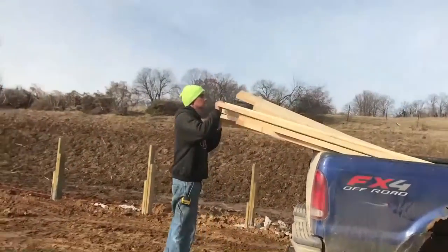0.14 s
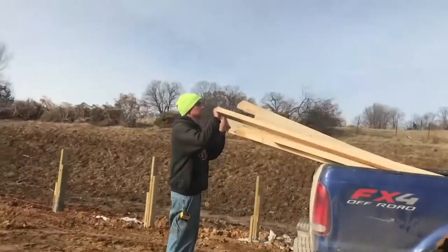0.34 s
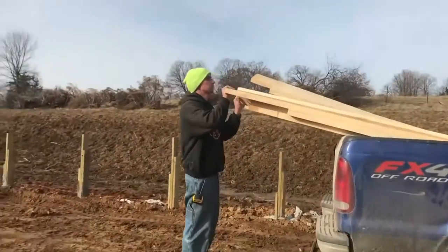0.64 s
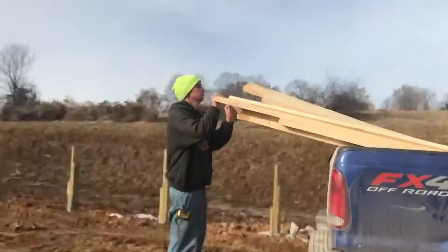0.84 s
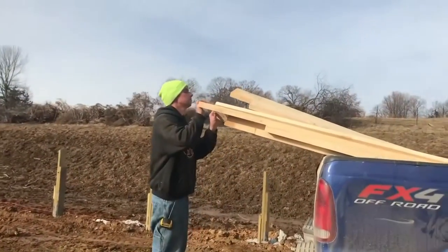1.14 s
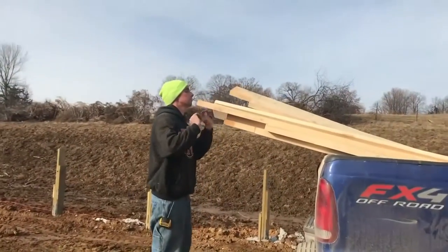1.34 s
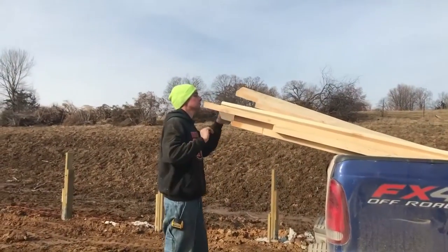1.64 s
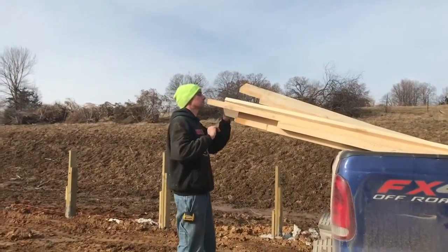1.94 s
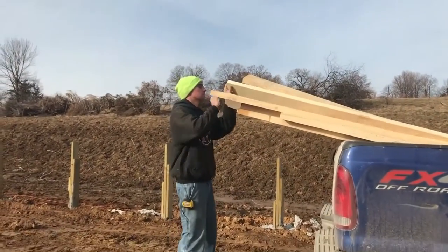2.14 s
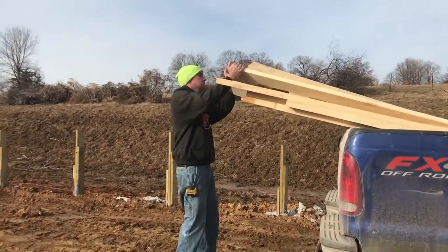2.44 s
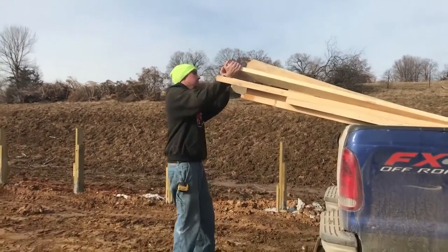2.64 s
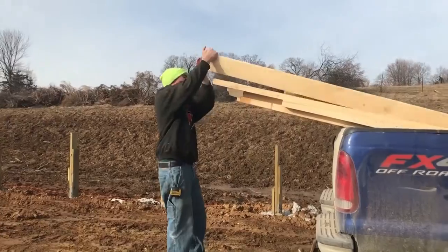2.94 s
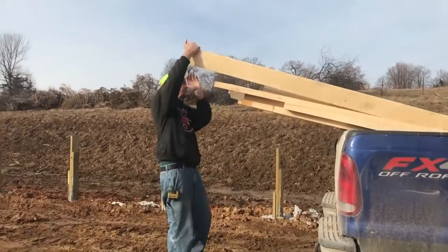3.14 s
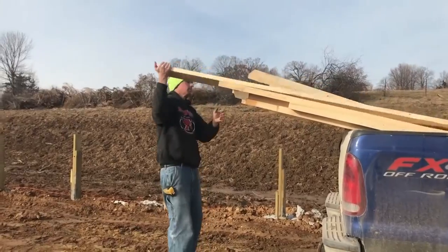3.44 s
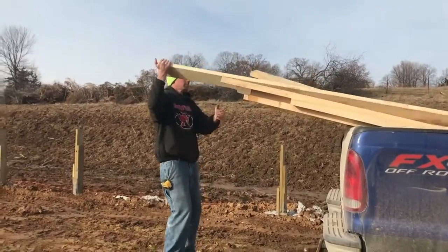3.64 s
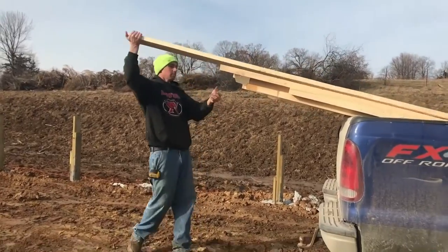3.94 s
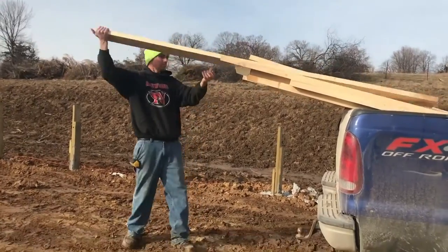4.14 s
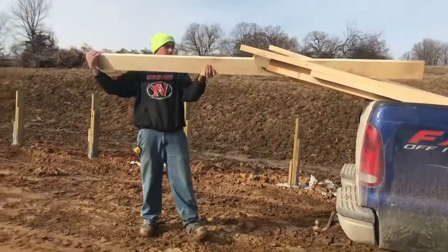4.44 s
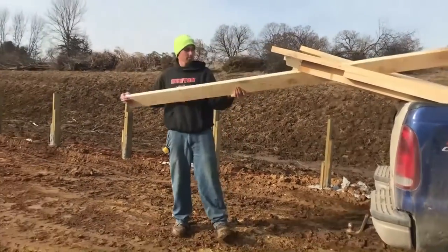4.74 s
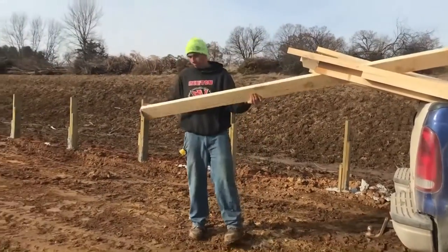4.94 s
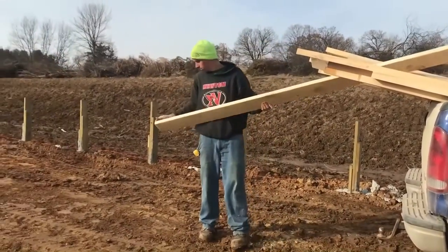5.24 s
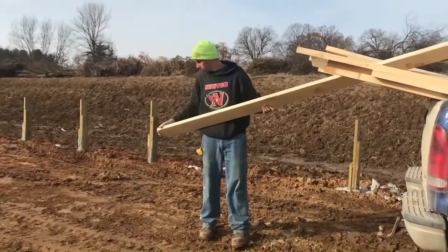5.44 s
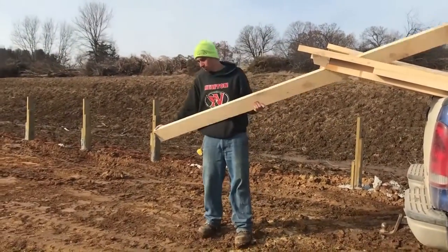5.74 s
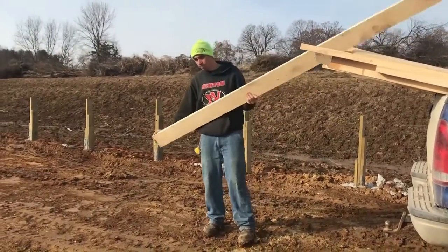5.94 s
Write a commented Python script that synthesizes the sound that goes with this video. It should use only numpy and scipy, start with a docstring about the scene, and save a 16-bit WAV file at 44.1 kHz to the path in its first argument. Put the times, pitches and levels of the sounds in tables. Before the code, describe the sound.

Outdoors in a quiet open field, lumber on a truck bed gives a fast burst of hard woody knocks in the first second. Near silence follows, with faint ticks, light rubbing and a low distant engine hum. Then the boards clatter again, with squeaky creaks and a dense run of knocks, and a rough scrape as one is drawn off. It ends in soft scuffs and ticks. Single microphone a few metres away, dry, no echo.

```python
"""Rough boards knock together as they are shaken loose and drawn off a stack on a truck bed in an open field.
Each blow rings decaying wood modes over a dense noise body. Rubbed faces turn clicks and hiss into wood
tone, rasp, fizz and a low rumble, with short scuffs and ringing ticks. Gliding tones and narrow hiss make
faint chirps and squeaks; narrow low noise makes an engine far off, and weak filtered noise the quiet air."""
import sys
import numpy as np
from scipy import signal
from scipy.fft import rfft, irfft, next_fast_len
from scipy.io import wavfile
from scipy.ndimage import uniform_filter1d

SR = 44100
rng = np.random.default_rng(int(sys.argv[2]) if len(sys.argv) > 2 else 0)


def materialize(psi):
    """Save the field psi as 16-bit PCM at rate SR to the path in sys.argv[1].

    A 1-D psi becomes a single channel; in a 2-D psi each row is a channel.
    """
    bounded = np.clip(np.atleast_2d(psi).T, -1, 1)
    quanta = np.round(bounded * 32767).astype(np.int16)
    wavfile.write(sys.argv[1], SR, quanta)


N = 268348
TIME = np.arange(N) / SR

# Boards struck together. Each row: start in seconds, blow level in dB, then thump, knock and clack
# in dB relative to the blow.
BLOWS = [(0.256, -29.5, -8, -17, -22), (0.343, -13, -22, -6, 3), (0.355, -14.5, -13.5, -15, -15),
         (0.471, -22, -11, -19, -19), (0.56, -4.5, -14, -9, -11), (0.599, -12.5, -26, -13.5, -15.5),
         (0.766, -8, -12.5, -5, -8.5), (0.956, -40, 6, -13, -17), (2.118, -38, -17, -10, -18),
         (2.696, -46, 6.5, -15, -9), (2.869, -29.5, -3, -11, -31), (2.885, -29.5, -21, -10, -15),
         (3.12, -18, -2, -7, -11), (3.154, -8.5, -44, -9.5, -24), (3.212, -23.5, -18, -14, -46),
         (3.299, -29.5, -12, -12, -18), (3.375, -32.5, 3.5, -13, -21), (3.596, -24.5, -7, -4, -12.5),
         (3.704, -27.5, -1.5, -13, -37), (3.739, -24.5, -11, -22, -30), (3.861, -23.5, -2, -2.5, -11.5),
         (3.911, -7, -17, -1.5, -17), (3.945, -17.5, -2, -7, -19), (4.004, -14.5, -5, -17, -14),
         (4.03, -10.5, -9, -6, -10.5), (4.069, -12, -15, -13, -29), (4.149, -20.5, -11, -26, -35),
         (4.229, -27.5, -29, -12, -8), (4.498, -38, 3, -15, -37), (4.887, -33, 2, -6, -12),
         (4.922, -36.5, 0, -28, -19), (5.922, -38, -5.5, -9, -8)]
# Modes of the boards and the bed. Each row: nominal frequency in Hz, level in dB, and decay time to
# -60 dB in seconds before the scaling by weight of blow.
WOOD_MODES = [(50, -4, 0.43), (82.7, 0.5, 0.41), (105.2, -7, 0.32), (135.2, -1, 0.59), (189, -4.5, 0.5),
              (223.2, -3.5, 0.3), (260.3, -4.5, 0.37), (301.6, 1.5, 0.24), (338, -3.5, 0.24),
              (396, -0.5, 0.16), (451, -6.5, 0.18), (577.3, -1.5, 0.26), (645.2, -5, 0.23),
              (741.6, -3, 0.15), (855, 0, 0.17), (919, -1, 0.073), (1011, -3, 0.12), (1083, -9.5, 0.028),
              (1259, -9.5, 0.1), (1380, -25, 0.24), (1584, 2.5, 0.053), (1814, -4.5, 0.062),
              (2023, -8.5, 0.037), (2300, -14, 0.082), (2500, -15, 0.075), (2760, -51, 0.033)]
# Centres, in Hz, of the thump, blow, knock, clack, rap and crack bands.
BLOW_BANDS_HZ = (90, 280, 590, 980, 1650, 3500)
# Dense body of a blow, its modes too many to tell apart. Each row: frequency in Hz, level in dB, and
# decay time to -60 dB in seconds before the same scaling.
BLOW_BODY = [(40, -7, 0.28), (101, 4.5, 0.87), (306, -6, 0.51), (736, 2, 0.16), (1460, -1, .12),
             (3050, -7.5, 0.19), (5060, -11, 0.044), (8900, -19, 0.045), (16000, -24, .06)]
# Steady sliding. Each row: time in seconds, then levels of rasp, rumble and fizz in dB.
SLIDING_LEVELS = [(0.0, -67, -56, -78), (0.13, -68.5, -62, -60.5), (0.28, -55.5, -45, -66),
                  (0.42, -63.5, -48, -72), (1.05, -75, -56.5, -68.5), (1.59, -72.5, -62, -70.5),
                  (2.1, -68.5, -56, -66), (2.47, -65.5, -53.5, -63.5), (2.75, -66.5, -59, -65.5),
                  (3.08, -49, -40.5, -58), (3.27, -62.5, -56, -67), (3.58, -61, -49.5, -61.5),
                  (3.75, -62, -35.5, -72), (3.9, -57.5, -45, -58.5), (4.2, -51.5, -40.5, -70),
                  (4.42, -50.5, -39, -53), (4.58, -62.5, -58.5, -56.5), (4.71, -52.5, -48, -58.5),
                  (4.86, -69.5, -52.5, -59.5), (5.05, -62.5, -64.5, -65), (5.56, -63.5, -61.5, -64.5),
                  (5.73, -67, -66, -64.5), (6.08, -68, -57, -64)]
# Resonances of scraped wood. Each row: frequency in Hz, width in Hz, level in dB.
WOOD_TONE = [(567, 34, -3.5), (825, 64, -24), (944, 94, 0.5), (1115, 93, -5), (1364, 110, -5),
             (1537, 49, -8.5), (1723, 17, -9), (1930, 53, -21.5)]
# Higher resonances in the rasp. Each row: frequency in Hz, width in Hz, level in dB.
RASP_RINGS = [(2236, 58, 10), (2500, 150, 4.5), (2900, 63, -11), (3240, 260, 1.5), (3970, 37, -12),
              (4070, 38, -9)]
# Spectrum of the rasp. Each row: frequency in Hz, relative density in dB per Hz.
RASP_SPECTRUM = [(880, -23), (1500, -4), (1710, -9.5), (2030, 0.5), (2190, -1), (3000, -1), (4390, -2),
                 (4930, -8.5), (6500, -11), (8450, -28), (14300, -120)]
# Spectrum of the fizz. Each row: frequency in Hz, relative density in dB per Hz.
FIZZ_SPECTRUM = [(4800, -11), (5800, -10), (6600, -12.5), (8600, -4), (9400, -4.5), (10500, -12),
                 (11700, -6.5), (14000, -11.5), (15500, -13), (16500, -2)]
# Short hard scuffs. Each row: start in seconds, length in seconds, rasp level in dB, brightness in dB.
SCUFF_EVENTS = [(0.058, 0.039, -62.5, -4), (.245, 0.082, -64.5, -17), (0.357, 0.039, -50.5, 5.5),
                (0.471, 0.061, -55, -10), (0.552, 0.044, -50, -3), (0.741, 0.011, -57, -7),
                (0.759, 0.056, -51, 5.5), (1.246, 0.15, -67.5, 1), (2.313, 0.084, -62, -8),
                (2.415, 0.04, -62, 7), (2.443, 0.098, -63.5, 13), (2.833, 0.11, -66, -7),
                (2.977, 0.016, -68, 23), (3.126, 0.05, -53, -20.5), (3.187, 0.013, -59, 14),
                (3.272, 0.084, -53, 1.5), (3.383, 0.03, -57, 0), (3.467, 0.055, -58, 2),
                (3.507, 0.056, -75, 10), (3.592, 0.036, -49, -3), (3.64, 0.025, -55.5, 6),
                (3.72, 0.073, -56.5, 11), (3.77, 0.025, -56, 5), (3.799, 0.057, -58, 17),
                (3.975, 0.012, -62, 8), (4.14, 0.029, -57, -1), (4.202, 0.02, -46, -5),
                (4.237, 0.029, -55, -6), (4.312, 0.14, -49, -7.5), (4.528, 0.11, -69, 20),
                (4.661, 0.073, -51.5, 1), (4.854, 0.013, -58, 5), (5.139, 0.072, -62.5, -1),
                (5.361, 0.065, -57, 2), (5.458, 0.029, -61.5, 0), (5.679, 0.1, -64, -3),
                (5.92, 0.096, -52, -9.5), (6.054, 0.035, -67.5, 20.5)]
# Ticks of splinters and grit. Each row: start in seconds, level in dB, frequency in Hz.
TICK_EVENTS = [(0.0618, -40, 2060), (0.3038, -30.5, 2100), (1.018, -35.5, 3280), (1.786, -42, 2060),
               (2.156, -38, 2440), (2.25, -59, 3040), (2.9944, -36, 3560), (3.1894, -43, 3140),
               (3.234, -38, 3250), (3.3685, -35, 3520), (3.479, -27, 2700), (3.49, -25.5, 3280),
               (3.584, -41, 4100), (3.5957, -31, 2290), (4.234, -32, 2220), (4.864, -43, 2660),
               (5.389, -30, 2270), (5.457, -49, 2400), (5.686, -38.5, 3280), (5.7132, -38, 4080),
               (5.7228, -25.5, 5780), (5.7278, -34.5, 2290), (5.7536, -39, 2020), (5.8378, -45, 2220)]
# Faint chirps and squeaks. Each row: start in seconds, length in seconds, start pitch in Hz,
# end pitch in Hz, level in dB.
CHIRP_EVENTS = [(.47, 0.061, 880, 850, -45), (1.036, 0.019, 720, 750, -48.5),
                (1.657, 0.039, 4250, 4370, -67), (2.512, 0.035, 5400, 5140, -60),
                (2.533, 0.041, 4800, 4300, -57.5), (2.564, 0.051, 3700, 3500, -57),
                (2.68, 0.052, 7200, 7050, -64), (3.228, 0.018, 3330, 3200, -49),
                (3.672, 0.038, 4070, 4150, -56), (3.719, 0.008, 4200, 4030, -45),
                (3.74, 0.013, 4200, 3870, -42), (3.775, 0.018, 5500, 5100, -49.5),
                (3.79, 0.017, 3040, 3060, -46), (3.799, 0.025, 4250, 4150, -46),
                (3.81, 0.033, 3500, 3440, -45), (3.814, 0.036, 1950, 1780, -49),
                (3.817, 0.032, 6650, 6700, -50), (4.234, 0.042, 932, 940, -36),
                (4.331, 0.05, 2250, 2190, -46), (4.382, 0.035, 4470, 4240, -47),
                (4.685, 0.052, 780, 824, -42.5), (4.77, 0.089, 4100, 4000, -56),
                (4.82, 0.044, 3900, 3600, -54), (5.305, 0.17, 1036, 993, -59),
                (5.578, 0.24, 974, 920, -61.5), (5.928, 0.093, 1100, 1088, -44),
                (5.918, 0.084, 1680, 1610, -44), (5.963, 0.036, 2020, 2050, -45),
                (6.045, 0.012, 5600, 5600, -55)]
# Overtones of a squeak. Each row: multiple of its pitch, relative level in dB.
SQUEAK_OVERTONES = [(2.051, 2), (3.3, -9)]
# Far engine note. Each row: time in seconds, pitch in Hz, level in dB.
ENGINE_NOTE = [(0, 65, -72), (1.4, 67, -66), (1.65, 68.6, -56), (2.0, 68.7, -51), (2.35, 68.3, -44.5),
               (2.75, 67.5, -51), (3.0, 67, -66), (5.0, 65.9, -59), (5.9, 64.8, -65), (6.085, 65, -40.5)]
# Low rumble between blows. Each row: time in seconds, level in dB.
RUMBLE_LEVEL = [(0.0, -52), (1.54, -59), (1.69, -52.5), (2.2, -53.5), (2.9, -57.5), (3.8, -45),
                (4.6, -53.5), (4.95, -54), (5.3, -61), (5.65, -54.5), (6.08, -51.5)]
# Spectrum of the air. Each row: frequency in Hz, relative density in dB per Hz.
AIR_SPECTRUM = [(15, -43), (25, -32), (65, -8), (92, -9), (162, -6.5), (225, -51), (357, -12), (443, -37),
                (494, -47), (2960, -72), (4330, -43), (4950, -50), (14700, -34), (16300, -61)]

RAP_DB, RAP_PER_CLACK = -12, 0.63  # the rap follows the clack
CRACK_DB, CRACK_PER_BLOW = -32, -0.3  # the crack grows less than the blow
RING_LIGHT, RING_PER_DB, HEAVY_DB = 0.94, -0.013, -15  # blows above HEAVY_DB clamp the boards: shorter ring
SNAP, SNAP_S = 0.98, 0.003  # extra gain of the body at first contact, and its decay constant
CHATTER_S = 0.012  # decay constant of the rebounds
TONE_DB, TONE_FROM_RASP = 1, 0.69  # the wood tone's level lies between rasp and rumble, raised by TONE_DB
SCUFF_TONE_DB, SCUFF_FIZZ_DB = -4.5, -7  # relative to the scuff's rasp
TICK_EDGE_T60_S, TICK_HZ = 0.015, 2500  # decay of the gritty edge at this pitch; higher ticks die sooner
FUZZ, FUZZ_PER_DB, FUZZ_FROM_DB = 0.71, 0.04, -46  # share of hiss in a whistle, rising above FUZZ_FROM_DB
OVERTONE_DB, OVERTONE_PER_DB = 35.5, 2.3  # louder squeaks carry relatively stronger overtones
CREAK_FROM_S, CREAK_TO_S = 3.67, 3.85  # a flurry of small squeaks
CREAK_LOW_HZ, CREAK_HIGH_HZ, CREAK_MAX_DB = 3000, 4320, -55  # range of starting pitch, loudest level
AIR_DB = -62
BAND_EDGE_HZ = 15750


def knock(blow_db, thump_db, knock_db, clack_db):
    """Modal impact: a blow and its rebounds excite decaying modes over a dense body of noise."""
    t = np.arange(round(0.4 * SR)) / SR
    rap_db = RAP_DB + RAP_PER_CLACK * clack_db
    crack_db = CRACK_DB + CRACK_PER_BLOW * blow_db
    bands_db = [thump_db, 0, knock_db, clack_db, rap_db, crack_db]
    ring = max(RING_LIGHT + RING_PER_DB * max(blow_db - HEAVY_DB, 0), 0.2)
    ringing = wood_ringing(t, bands_db, ring)
    body = blow_body(t, bands_db, ring)
    snap = 1 + SNAP * np.exp(-t / SNAP_S)
    onset = 1 - np.exp(-t / 0.0012)
    return amp(blow_db) * (ringing + amp(10.0) * body * snap) * onset


def wood_ringing(t, bands_db, ring):
    """Superposition of damped sine modes, repeated by random rebounds that share one blow's energy."""
    hz, db, t60 = np.array(WOOD_MODES).T[:, :, None]
    scatter_db, detune = rng.standard_normal((2, len(WOOD_MODES), 1))
    # every blow weighs and tunes the modes a little differently
    weight = amp(db + read(hz, BLOW_BANDS_HZ, bands_db) + 3.15 * scatter_db) * np.sign(detune)
    decay = amp(-60 * t / (t60 * ring))
    modes = (weight * decay * np.sin(2 * np.pi * hz * (1 + 0.016 * detune) * t)).sum(0)
    rebounds = rng.standard_normal(4000) * (rng.random(4000) < 0.006) * np.exp(-t[:4000] / CHATTER_S)
    rebounds[0] = 3  # the blow itself
    ringing = signal.fftconvolve(modes, rebounds)[:len(t)]
    return ringing * 0.38 * np.linalg.norm(modes) / np.linalg.norm(ringing)


def blow_body(t, bands_db, ring):
    """Statistical modal density: noise stands for crowded modes, each frequency with its own decay."""
    hz, when, z = signal.stft(rng.standard_normal(len(t)), SR, nperseg=512, noverlap=384)
    body_hz, body_db, body_t60 = np.transpose(BLOW_BODY)
    colour_db = read(hz, body_hz, body_db) + read(hz, BLOW_BANDS_HZ, bands_db)
    t60 = ring * read(hz, body_hz, body_t60)
    z *= amp(colour_db[:, None] - 60 * when / t60[:, None])
    return signal.istft(z, SR, nperseg=512, noverlap=384)[1][:len(t)]


def sliding():
    """Friction excitation: one rubbing drives tone, rasp and fizz; slower catches rumble the stack."""
    rub = grit(4000, spread_db=3.0, hiss=1.8, flicker_db=1.2, flicker_s=0.004)
    rub = patchy(rub, patchy_db=1.4)
    broad_tone = coloured(rub, [(450, -2), (650, 14.5), (2000, 1), (2400, -52)])
    tone = evened(rung(rub, WOOD_TONE) + 1.43 * broad_tone)
    rasp = evened(0.32 * rung(rub, RASP_RINGS) + coloured(rub, RASP_SPECTRUM))
    fizz = coloured(rub, FIZZ_SPECTRUM)
    s, *curves = np.transpose(SLIDING_LEVELS)
    rasp_db, rumble_db, fizz_db = (np.interp(TIME, s, curve) for curve in curves)
    tone_db = TONE_DB + TONE_FROM_RASP * rasp_db + (1 - TONE_FROM_RASP) * rumble_db
    rattle = stirred(db=-49, share=0.92, fall_db_per_s=42, rise_s=0.021)
    faces = (amp(rasp_db) + scuffs(0, lean=0)) * rasp
    faces += (amp(tone_db) + scuffs(SCUFF_TONE_DB, lean=-1.02) + amp(-4.5) * rattle) * tone
    faces += (amp(fizz_db) + scuffs(SCUFF_FIZZ_DB, lean=1)) * fizz
    catches = grit(300, spread_db=2.0, hiss=1.0, flicker_db=1.5, flicker_s=0.016)
    stack = coloured(catches, [(70, -20), (110, 5.5), (200, 3.5), (330, 3.0), (500, -4.5), (750, -36.5)])
    return faces + (amp(rumble_db) + rattle) * stack


def grit(per_s, spread_db, hiss, flicker_db, flicker_s):
    """Random impulse process: clicks of uneven size over hiss, with a flickering level."""
    size_db = spread_db * np.minimum(rng.exponential(1, N), 3.2)
    clicks = (rng.random(N) < per_s / SR) * rng.choice([-1, 1], N) * amp(size_db)
    width = max(round(flicker_s * SR), 1)
    flicker = evened(uniform_filter1d(uniform_filter1d(rng.standard_normal(N), width), width))
    return evened((evened(clicks) + hiss * rng.standard_normal(N)) * amp(flicker_db * flicker))


def patchy(x, patchy_db):
    """Surface heterogeneity: rough timber shifts the colour of the rubbing from patch to patch."""
    z = signal.stft(x, nperseg=256)[2]
    patches = uniform_filter1d(uniform_filter1d(rng.standard_normal(z.shape), 4, axis=0), 7, axis=1)
    return evened(signal.istft(z * amp(patchy_db * evened(patches)), nperseg=256)[1][:N])


def scuffs(offset_db, lean):
    """Transient friction: quick bite, slower release; brightness leans levels from tone to fizz."""
    level = np.zeros(N)
    for s, length_s, db, bright_db in SCUFF_EVENTS:
        u = np.linspace(0, 1, round(length_s * SR))
        shape = np.minimum(u / 0.14, 1) * np.minimum((1 - u) / 0.51, 1) ** 0.8
        add(level, s, amp(db + offset_db + lean * bright_db) * shape)
    return level


def stirred(db, share, fall_db_per_s, rise_s):
    """Damped energy storage: each blow adds a jolt to the shaking load, which dies away."""
    jolts = np.zeros(N)
    for s, blow_db, *_ in BLOWS:
        jolts[round(s * SR)] += amp(share * blow_db)
    shaking = signal.lfilter([1], [1, -amp(-fall_db_per_s / SR)], jolts)
    return amp(db) * uniform_filter1d(shaking, round(rise_s * SR))


def ticks():
    """Impulse response of small splinters and grit: two brief damped partials and a bright noise edge."""
    out, t = np.zeros(N), np.arange(1500) / SR
    for s, db, hz in TICK_EVENTS:
        fade = amp(-60 * t / max(TICK_EDGE_T60_S * (TICK_HZ / hz) ** 0.69, 0.003))
        edge = signal.lfilter([1, -1], [1, -1.45, 0.62], rng.standard_normal(len(t))) * fade
        # powers of the fade make the partials die faster than the edge
        low = np.sin(2 * np.pi * hz * t) * fade ** 3.1
        high = np.sin(2 * np.pi * 1.534 * hz * t) * fade ** 1.64
        add(out, s, amp(db) * (low + 0.42 * high + 0.21 * edge))
    return out


def chirps():
    """Frequency modulation: short gliding whistles with rough overtones and a fluttering level."""
    out = np.zeros(N)
    for s, length_s, start_hz, end_hz, db in list(CHIRP_EVENTS) + creak():
        hz = np.linspace(start_hz, end_hz, round(length_s * SR))
        overtones = sum(amp(top_db) * narrow(np.minimum(multiple * hz, SR / 2.2), 0.71)
                        for multiple, top_db in SQUEAK_OVERTONES)
        fuzz = np.clip(FUZZ + FUZZ_PER_DB * max(db - FUZZ_FROM_DB, 0), 0, 1)
        whistle = narrow(hz, fuzz) + amp(OVERTONE_DB + OVERTONE_PER_DB * db) * overtones
        # the contact sticks and slips
        stutter = evened(amp(1.1 * evened(uniform_filter1d(rng.standard_normal(len(hz)), 130))))
        add(out, s, amp(db) * whistle * stutter * signal.windows.tukey(len(hz), 0.4))
    return out


def creak(count=20):
    """Random point process: brief falling squeaks, as rows like the chirps; longer ones are fainter."""
    when, pitch, size = rng.random((count, 3)).T
    hz = CREAK_LOW_HZ + pitch * (CREAK_HIGH_HZ - CREAK_LOW_HZ)
    s = CREAK_FROM_S + when * (CREAK_TO_S - CREAK_FROM_S)
    return list(zip(s, 0.019 * (0.6 + size), hz, 0.96 * hz, CREAK_MAX_DB - 6 * size))


def engine():
    """Narrow-band noise: a wavering far note, and a low rumble that swells as blows shake the truck bed."""
    s, hz, db = np.transpose(ENGINE_NOTE)
    note = amp(np.interp(TIME, s, db)) * evened(narrow(np.interp(TIME, s, hz), 0.25))
    rumble = coloured(rng.standard_normal(N), [(25, -8), (45, 41), (80, 39), (130, 26.0), (200, -46)])
    shaken = stirred(db=-38.5, share=0.71, fall_db_per_s=42, rise_s=0.069)
    return note + (amp(np.interp(TIME, *np.transpose(RUMBLE_LEVEL))) + shaken) * rumble


def quiet_air():
    """Broadband background: uneven, flickering noise shaped by a mostly low spectrum."""
    noise = grit(2000, spread_db=15.0, hiss=11.0, flicker_db=3.2, flicker_s=0.017)
    return amp(AIR_DB) * coloured(noise, AIR_SPECTRUM)


def narrow(hz, fuzz):
    """Tone and narrow-band noise along one pitch curve: fuzz 0 is a clear sine, 1 a narrow hiss."""
    hiss = resonate(rng.standard_normal(len(hz)), hz, 0.063 * hz[0])
    hiss = evened(resonate(hiss, hz, 0.068 * hz[0]))
    return (1 - fuzz) * np.sin(2 * np.pi * np.cumsum(hz) / SR) + fuzz * hiss


def rung(x, rings):
    """Parallel resonance: x heard through a set of rings (Hz, width Hz, dB), rms 1."""
    return evened(sum(amp(db) * evened(resonate(x, hz, width_hz)) for hz, width_hz, db in rings))


def resonate(x, hz, width_hz):
    """Heterodyne resonance of gain 1: shift the pitch curve hz to zero, smooth, and shift back."""
    turn = np.exp(2j * np.pi * np.cumsum(hz * np.ones(len(x))) / SR)
    r = np.exp(-np.pi * width_hz / SR)
    return 2 * (turn * signal.lfilter([1 - r], [1, -r], x / turn)).real


def coloured(x, spectrum):
    """Linear filtering in frequency: weights x by the spectrum (Hz, dB), then scales to rms 1."""
    size = next_fast_len(len(x))
    hz = np.fft.rfftfreq(size, 1 / SR)
    gain = amp(read(hz, *np.transpose(spectrum)))
    return evened(irfft(rfft(x, size) * gain, size)[:len(x)])


def read(hz, at_hz, values):
    """Logarithmic pitch scale: straight lines between points on a log-frequency axis."""
    return np.interp(np.log(hz + 1), np.log(np.asarray(at_hz) + 1), values)


def amp(db):
    """Level law: decibels to amplitude gain."""
    return 10 ** (np.asarray(db) / 20)


def evened(x):
    """Power normalization: scales x to rms 1."""
    return x / np.sqrt(np.mean(x ** 2) + 1e-20)


def add(mix, s, sound):
    """Superposition: mixes a sound in at s seconds."""
    part = mix[round(s * SR):][:len(sound)]
    part += sound[:len(part)]


def scene():
    """Free-field superposition: all sources at one microphone, with no walls to answer."""
    boards = sliding() + ticks()
    for s, *blow in BLOWS:
        add(boards, s, knock(*blow))
    return (boards + chirps() + engine() + quiet_air())[None]


def record(dry):
    """Band-limited transduction: the microphone's bass roll-off, then an upper band limit."""
    cut = signal.lfilter(*signal.butter(3, 40, "high", fs=SR), dry)
    band_limit = signal.firwin(511, BAND_EDGE_HZ, window=("kaiser", 9), fs=SR)
    return signal.oaconvolve(cut, band_limit[None], "same")


dry = scene()
out = record(dry)
materialize(out)
```